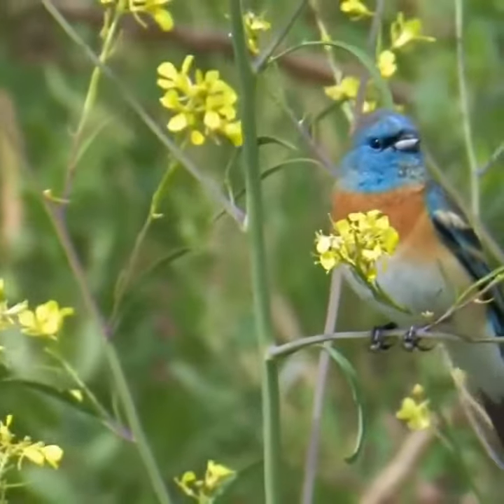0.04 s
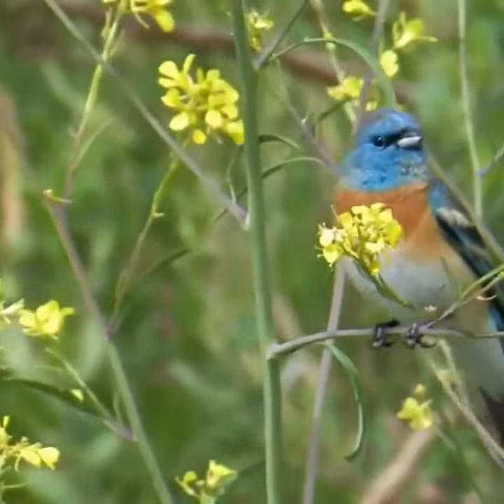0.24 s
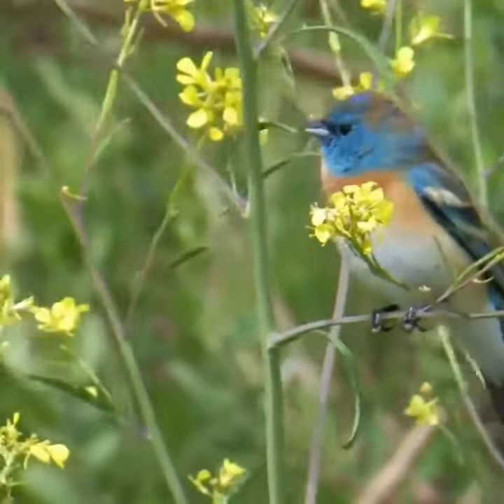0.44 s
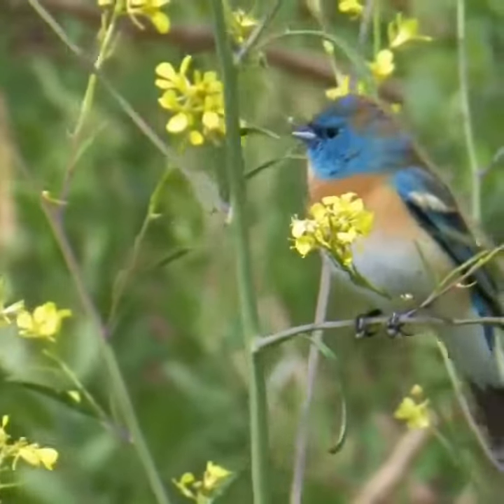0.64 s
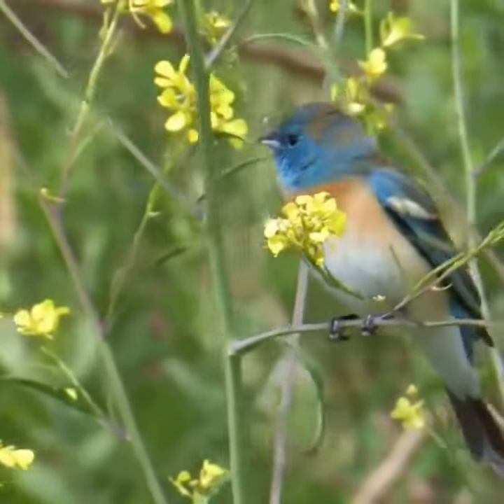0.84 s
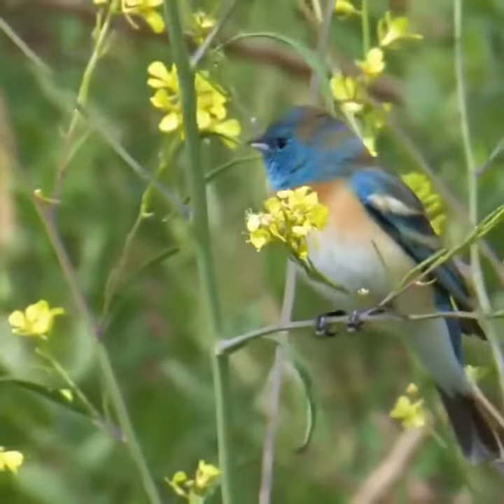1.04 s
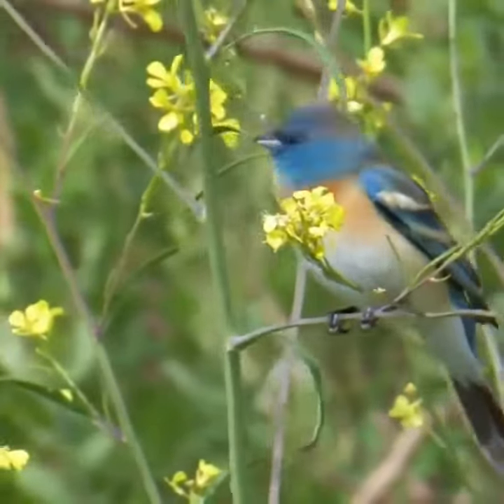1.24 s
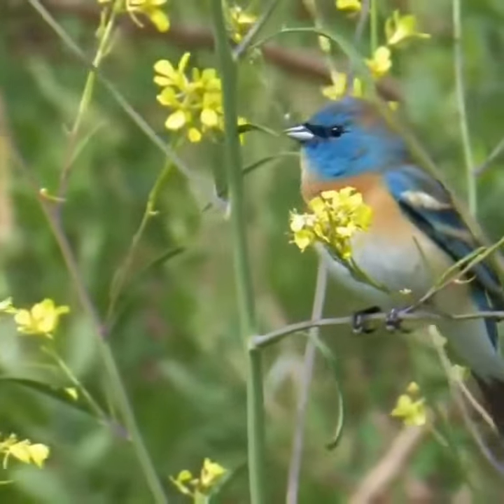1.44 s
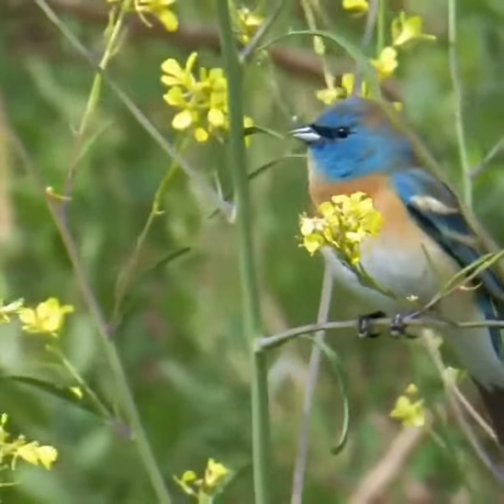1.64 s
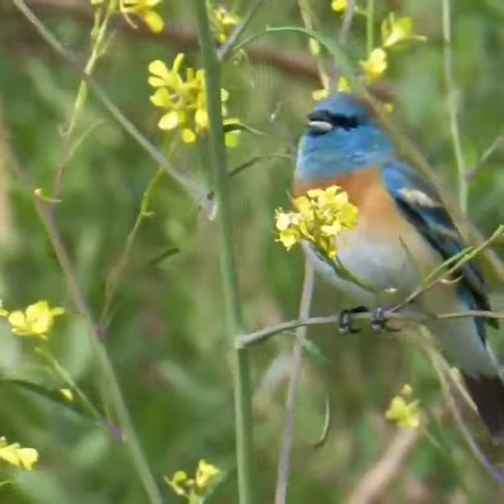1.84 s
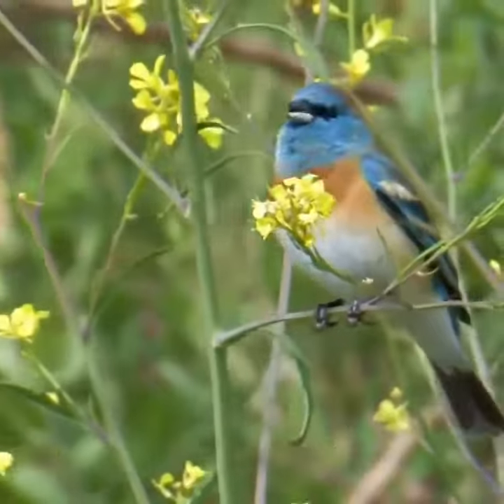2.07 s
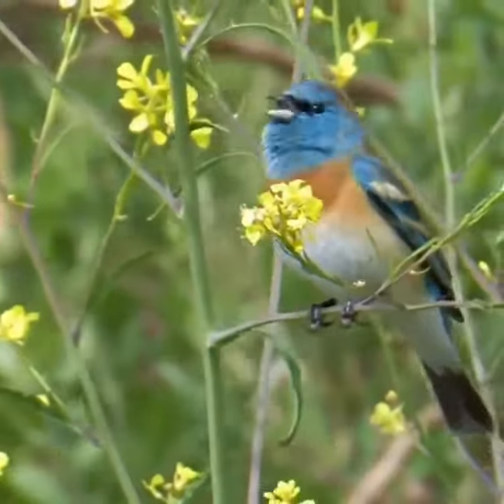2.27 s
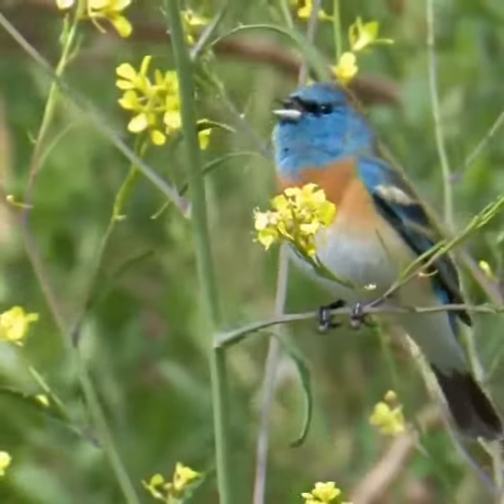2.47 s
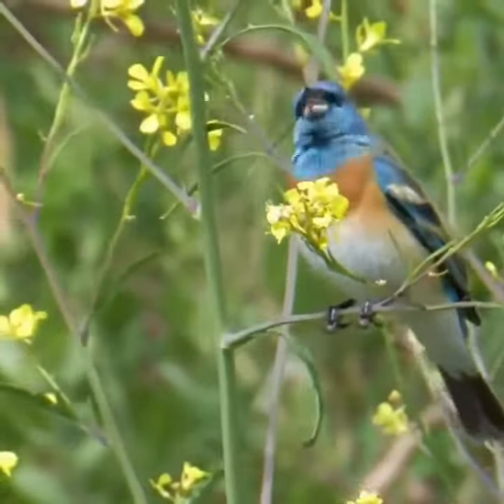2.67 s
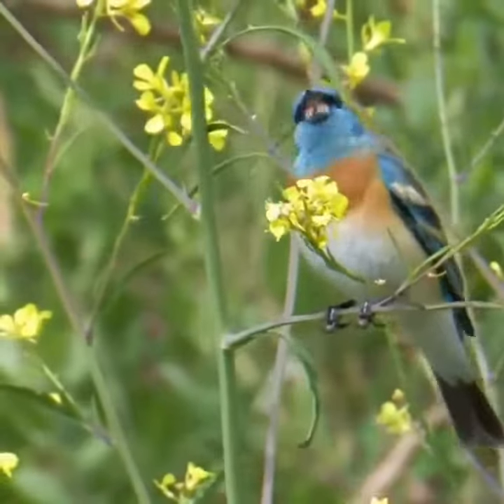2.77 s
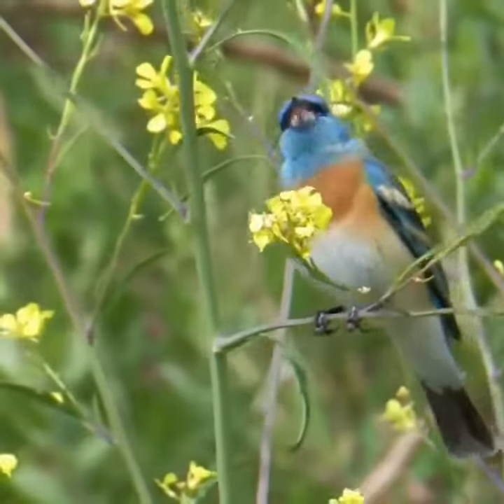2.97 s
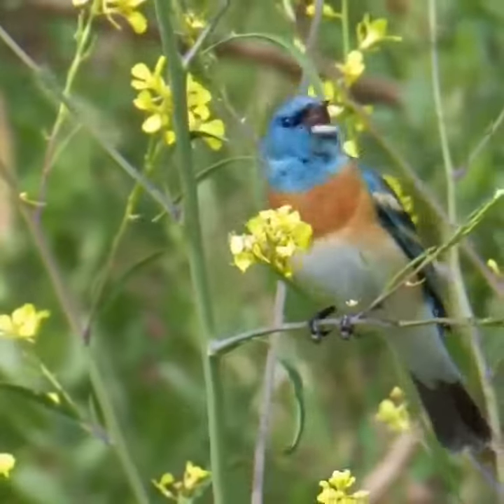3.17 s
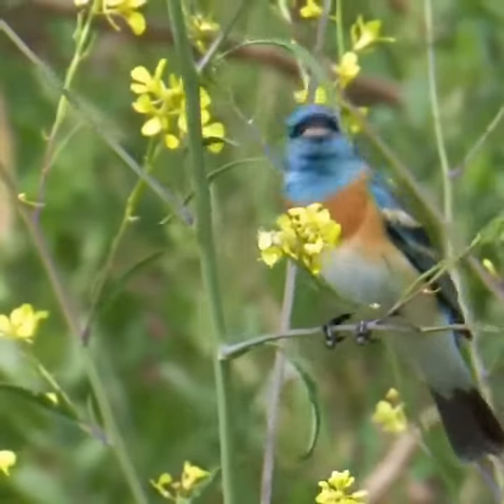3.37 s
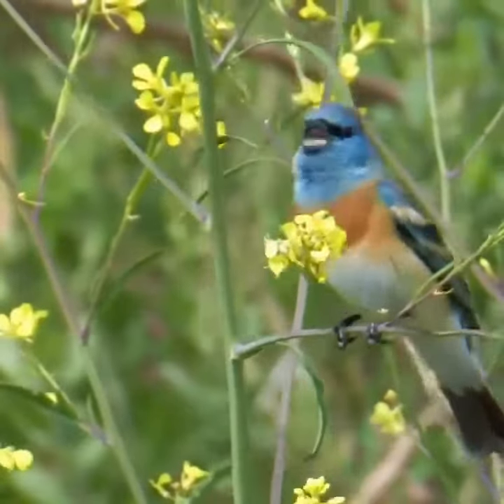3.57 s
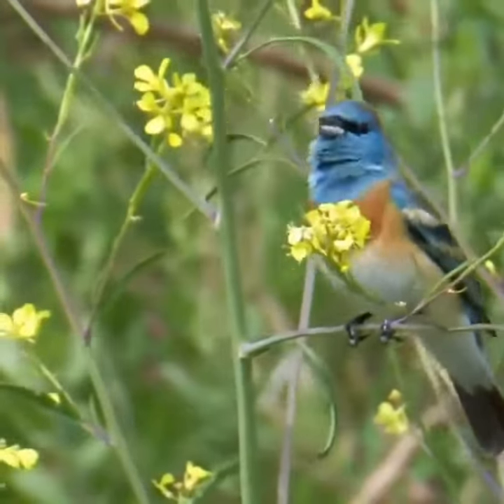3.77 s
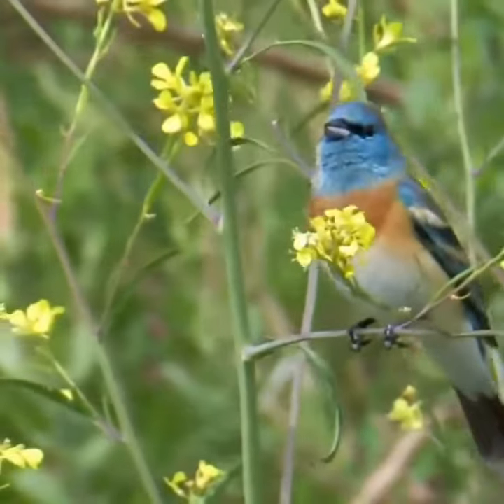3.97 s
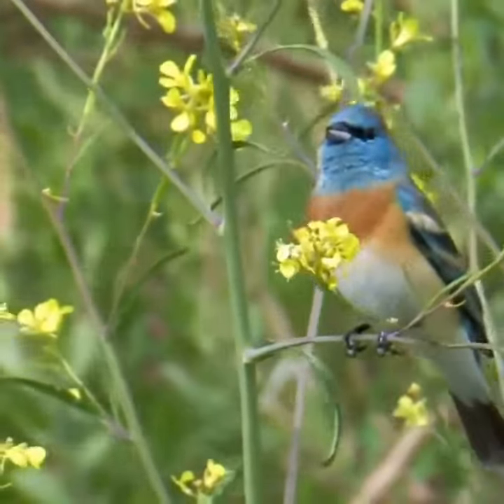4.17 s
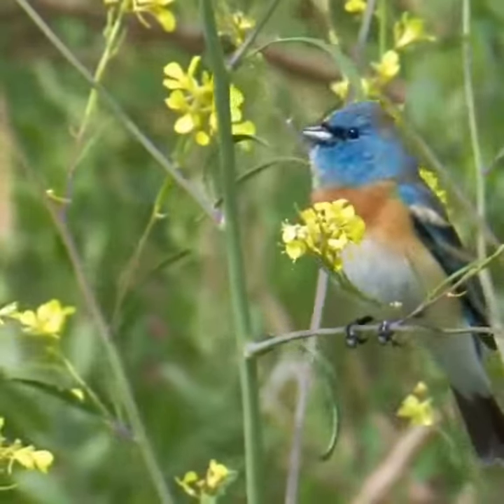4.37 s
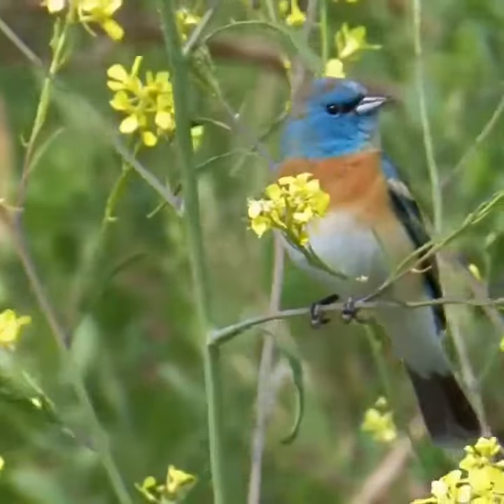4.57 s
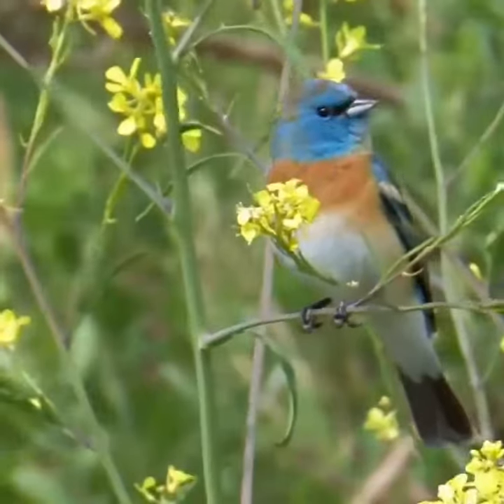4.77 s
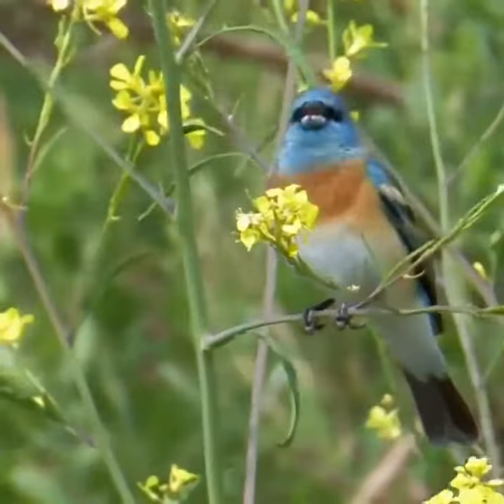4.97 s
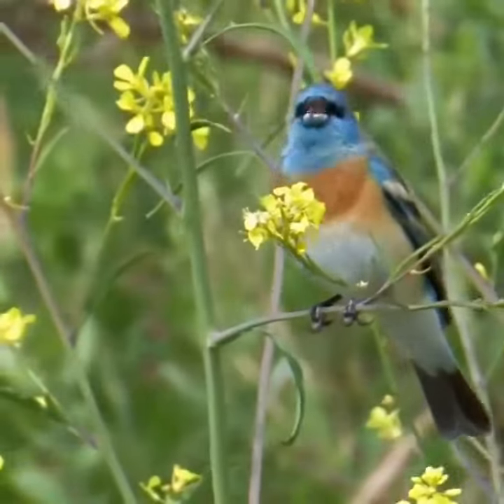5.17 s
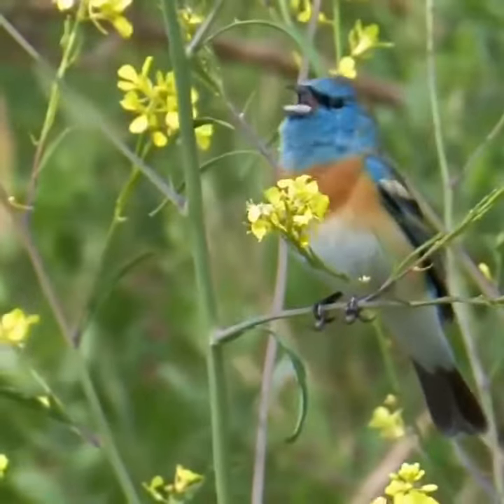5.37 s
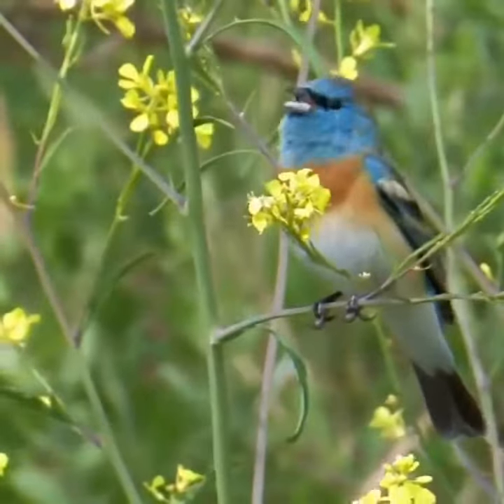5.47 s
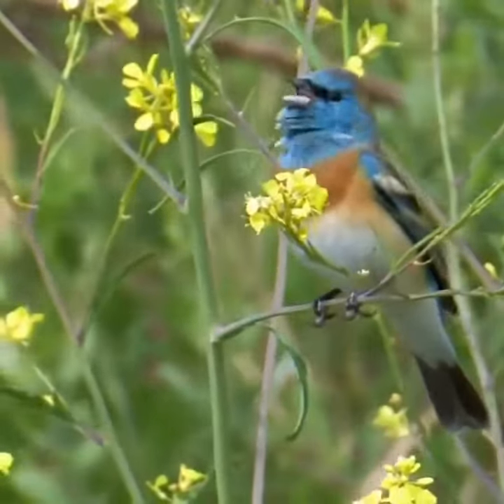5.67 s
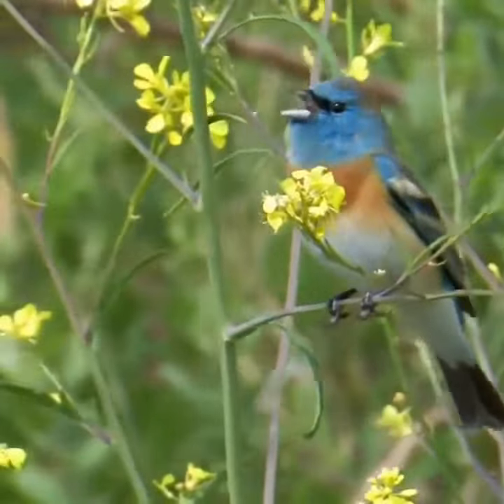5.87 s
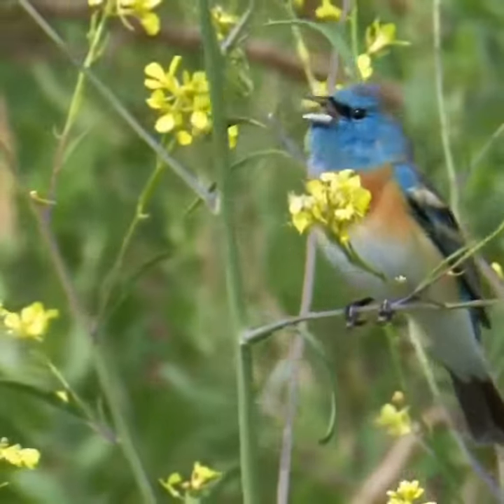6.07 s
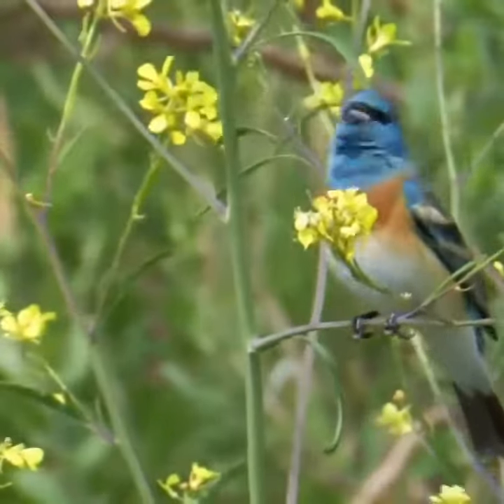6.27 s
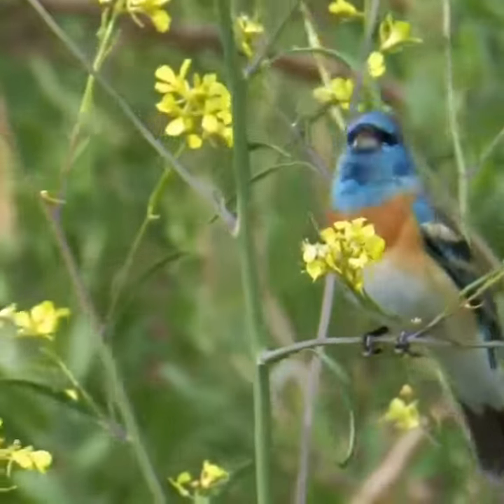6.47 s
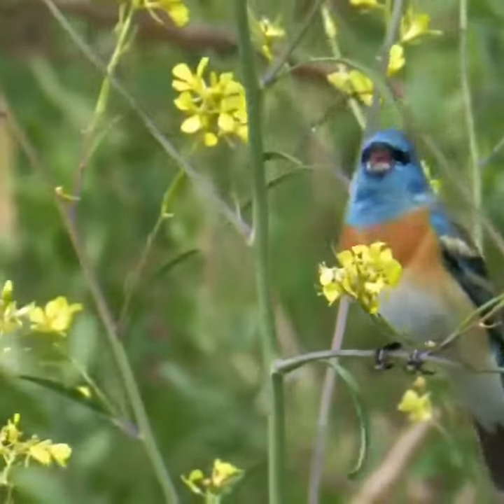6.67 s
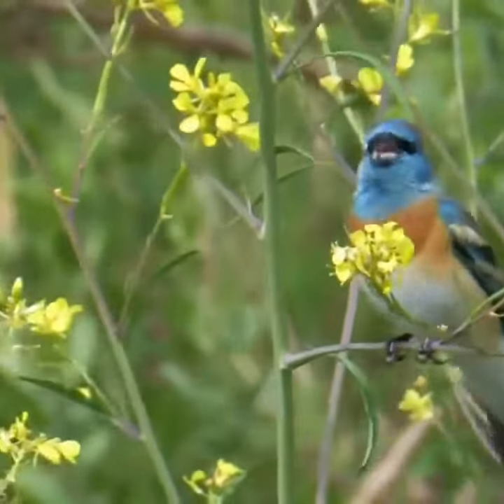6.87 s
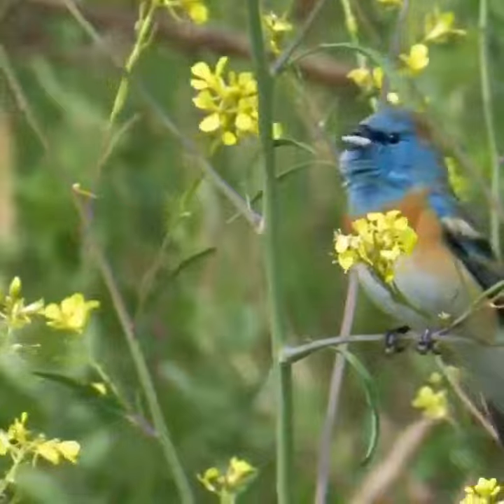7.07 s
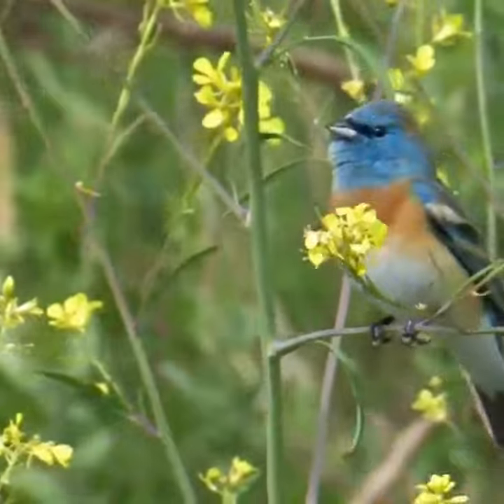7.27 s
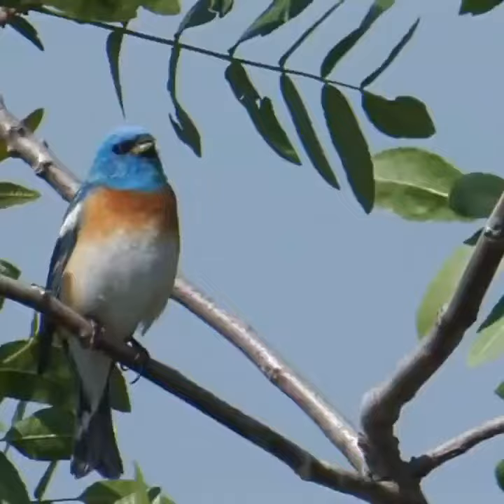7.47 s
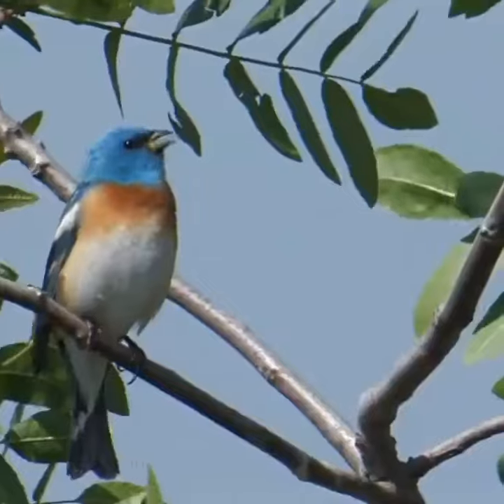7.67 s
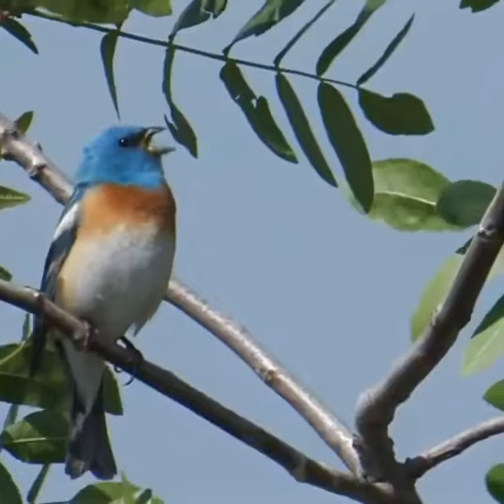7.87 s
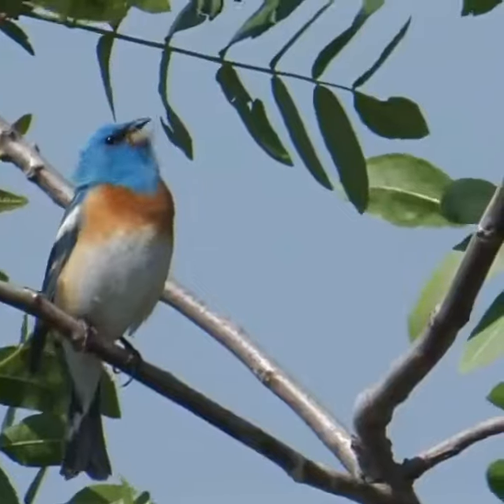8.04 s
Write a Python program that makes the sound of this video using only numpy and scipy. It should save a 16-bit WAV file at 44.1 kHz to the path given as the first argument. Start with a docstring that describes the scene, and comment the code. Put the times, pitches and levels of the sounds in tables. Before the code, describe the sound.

A small songbird close by sings two bright phrases of buzzy notes and fast high sweeps, over outdoor hush, wind rumble and faint distant birds.

```python
"""Hoarse calls and whistles of far songbirds open the scene, over an outdoor hush and gusts on the microphone.
A near bunting then sings two phrases of swept tones: three buzzy notes, a long slur, three V notes, paired sweeps.
A quail crows far off in harmonics; small snaps and a rustle are shaped noise.
The level drops briefly three times; after the last, a second bunting starts up in a quieter place."""
import sys
import numpy as np
from scipy import signal
from scipy.fft import rfft, irfft
from scipy.io import wavfile
from scipy.ndimage import uniform_filter1d

SR = 44100
rng = np.random.default_rng(int(sys.argv[2]) if len(sys.argv) > 2 else 0)


def master_out(mix):
    """Clip the mix to full scale and print it as 16-bit PCM to the path in sys.argv[1]."""
    frames = np.transpose(np.atleast_2d(mix))
    ceiling = np.clip(frames, -1, 1)
    pcm = np.round(ceiling * 32767).astype(np.int16)
    wavfile.write(sys.argv[1], SR, pcm)


N = 371322
TIME = np.arange(N) / SR

# Syllable contours, before the length, pitch and level factors: time_s, pitch_hz, level_db
WHISTLE_SHAPE = [(0.0, 5200, -23.5), (0.017, 5610, -18), (0.0325, 5880, -4.5), (0.0445, 6263, -1.9),
                 (0.065, 6450.0, 0.9), (0.074, 6597, -2), (0.082, 6050, -12)]
SLUR_SHAPE = [(0.0, 2860, -29.5), (0.0215, 2808, -19.5), (0.05, 2926, -16), (0.0875, 3425, -10),
              (0.134, 3860, -2), (0.167, 4200.0, -6.5), (0.1875, 4650.0, -1), (0.211, 5040, -3.9),
              (0.2225, 5000, -28)]
VEE_SHAPE = [(-.004, 7900, -30), (0.006, 6930, -3), (0.016, 5750, 0), (0.023, 4600, -4.5),
             (0.03, 3300, -22), (0.034, 4950, -.5), (0.04, 6200, 2), (0.053, 6680, -3.5),
             (0.061, 6750, -18)]
FLICK_SHAPE = [(0, 2753, -14.5), (.02, 2105, -33), (.032, 2356, -30), (.039, 2906, -11.5),
               (.05, 3500, -2.5), (.0635, 3825, -0.5), (.072, 3740, -34)]  # sinks on from the last fall, then turns up
# When each contour is sung: start_s, length_factor, pitch_factor, level_db
WHISTLE_TIMES = [(2.495, .95, .955, -24), (2.7367, 1.0, .997, -17), (2.9486, 1.03, .99, -12),
                 (5.587, .9, .96, -20.5), (5.827, 1.0, .995, -10.5), (6.0317, 1.0, 1.01, -12.5)]
SLUR_TIMES = [(3.1126, 0.99, 1.0, -8.5), (6.1869, 1.0, 0.99, -8.5)]
VEE_TIMES = [(3.3903, 0.93, 1.044, -9.5), (3.4865, 0.95, 1.034, -8.5), (3.5758, 0.95, 0.99, -9),
             (6.4664, 0.99, 1.046, -12.5), (6.5574, 0.97, 1.003, -10.5), (6.652, 0.93, 1, -10)]
FLICK_TIMES = [(4.346, 1.01, 1, -14), (7.6708, 0.976, 1, -20)]
# Near reflections that reach the microphone: delay_s, gain_left, gain_right
NEAR_REFLECTIONS = [(0.000593, 0.0012, 0.16), (0.000971, -0.028, -0.04), (0.001544, 0.57, 0.52),
                    (0.001819, 0.11, 0.17), (0.002168, 0.22, -0.051), (0.002518, -0.14, -0.14),
                    (0.00312, -0.03, -0.18), (0.003775, 0.0, 0.18)]
# Spectrum of a faint low hiss under the loud notes: frequency_hz, level_db (per Hz)
UNDER_HISS_SPECTRUM = [(120, -25), (300, -3), (1100, 0), (1800, -5), (3000, -20)]


def bunting(hiss_db=-41):
    """Comb filtering: close reflections make each sweep of the near song swell and dip as its pitch moves."""
    song = buzzes() + sing(WHISTLE_SHAPE, WHISTLE_TIMES) + sing(SLUR_SHAPE, SLUR_TIMES)
    song = song + sing(VEE_SHAPE, VEE_TIMES) + sweeps() + sing(FLICK_SHAPE, FLICK_TIMES)
    hz = np.fft.rfftfreq(N, 1 / SR)
    paths = np.ones((2, len(hz)), complex)  # the direct sound
    for delay, left, right in NEAR_REFLECTIONS:
        paths += np.array([[left], [right]]) * np.exp(-2j * np.pi * hz * delay)
    heard = irfft(rfft(song) * paths, N)
    loudness = uniform_filter1d(abs(song), size=400)
    hiss = amp(hiss_db) * loudness * noise(UNDER_HISS_SPECTRUM, AIR_LIKENESS)
    scattered = field(heard, wet_db=-26, t60=0.74, early_db=-13.5, early_t60=0.08)
    return scattered * amp([[.4], [-.4]]) + hiss


# One quick downstroke, at full effort and sung softly (lingering at the top): time_s, pitch_hz, level_db
FULL_STROKE = [(0.0, 5480, -9), (0.003, 5106, -1.5), (0.008, 4666, -1.5), (0.012, 3950.0, 1),
               (0.018, 3330, -21.5)]
SOFT_STROKE = [(0, 4950, -8), (.003, 5120, -0.5), (.009, 4880, 1), (.014, 4350, -4), (.018, 3600, -8)]
# Buzzes of five strokes: start_s, stroke_period_s, pitch_factor, level_db
BUZZ_TIMES = [(2.4092, .0153, 1.01, -33), (2.6503, .0153, .945, -22.5), (2.864, .0145, .965, -16),
              (5.4992, .015, 1.01, -27), (5.7405, .015, .95, -19.5), (5.957, .0148, .98, -14.3)]
# Away from a crest (in strokes, counted from 0) the strokes are softer and shorter
CREST_STROKE, EDGE_DB, EDGE_SHORTER, STROKE_STRETCH = 2.7, -8, .18, 1.1
# Pitch rises with the square of the distance from the lowest stroke
LOWEST_STROKE, EDGE_HIGHER = 1.7, .009


def buzzes(count=5, soft_db=-30, loud_db=-18, last_effort=.55, uneven_db=.8, uneven_pitch=.01):
    """Pulse train: even strokes under one swell; effort straightens and deepens them, and the last one relaxes."""
    out = np.zeros(N)
    for s, period, pitch, top_db in BUZZ_TIMES:
        for k, (louder, higher) in enumerate(rng.standard_normal((count, 2))):
            edge = (k / CREST_STROKE - 1) ** 2
            effort = np.interp(top_db, [soft_db, loud_db], [0, 1])
            if k == count - 1:
                effort *= last_effort
            shape = effort * np.array(FULL_STROKE) + (1 - effort) * np.array(SOFT_STROKE)
            bend = 1 + EDGE_HIGHER * (k - LOWEST_STROKE) ** 2 + uneven_pitch * higher
            length = STROKE_STRETCH - EDGE_SHORTER * edge
            stroke = syllable(shape, length, pitch * bend, jitter=.005, fade=.0016)
            add(out, s + k * period, amp(top_db + EDGE_DB * edge + uneven_db * louder) * stroke)
    return out


# Hook and fall contours, before their factors: time_s, pitch_hz, level_db
HOOK_SHAPE = [(0.0, 2817, -28), (0.0055, 3614, -16), (0.013, 4160, -6.5), (0.0265, 4363, -7.5),
              (0.042, 4577, -4.5), (0.055, 5022, 2.5), (0.06, 6300.0, -7.5), (0.064, 4300.0, -3.5),
              (0.07, 2875, -14.5)]
FALL_SHAPE = [(0, 7640, -23), (.0095, 7220, -11.5), (.023, 6314, -1), (.031, 5213, 3), (.0415, 4480, -2.5),
              (.06, 3803, 0.5), (.08, 3220, -8), (.09, 2924, -18), (.098, 2730, -37)]
# Pairs of sweeps: start_s, hook_pitch_factor, wait_until_fall_s, fall_length_factor, hook_level_db
SWEEP_PAIRS = [(3.6865, .97, .0846, .9, -6.5), (3.9226, 1.003, .0884, .97, -7.3),
               (4.1678, 1.018, .0888, .96, -7.5), (6.7685, .96, .0898, .93, -7.5),
               (7.0058, .99, .0868, .94, -8), (7.2414, 1.013, .0886, .98, -7.5),
               (7.4984, 1.0, .0875, .96, -9.3)]
HOOK_LENGTH, FALL_PITCH, FALL_DB = .99, 1.004, -2.8  # factors, and dB from hook to fall


def sweeps(chirp_db=-15):
    """Two-voice source: a hook, then a long fall; the other side of the syrinx chirps as each hook starts."""
    hooks = sing(HOOK_SHAPE, [(s, HOOK_LENGTH, pitch, db) for s, pitch, _, _, db in SWEEP_PAIRS])
    fall_times = [(s + wait, length, FALL_PITCH, db + FALL_DB) for s, _, wait, length, db in SWEEP_PAIRS]
    falls = sing(FALL_SHAPE, fall_times)
    chirps = whistles([(s + .0015, .012, 3900, 4900, 5640, db + chirp_db) for s, _, _, _, db in SWEEP_PAIRS])
    return hooks + falls + chirps


def sing(shape, rows):
    """Superposition: repeats one syllable at each row's time, length, pitch and level."""
    out = np.zeros(N)
    for s, length, pitch, db in rows:
        add(out, s + shape[0][0] * length, amp(db) * syllable(shape, length, pitch))
    return out


def syllable(shape, length, pitch, jitter=0.003, second_db=-38, second_corner_hz=3300, wide_noise_db=-41, fade=0.0039,
             under_ratio=.405, under_db=-38, mixed_db=-2):
    """Frequency modulation: the syrinx sweeps a near-pure tone; low notes show an octave, high ones an undertone."""
    s, hz, db = np.transpose(shape)
    u = np.arange(s[0], s[-1], 1 / (SR * length))  # contour time, stretched by length when played
    hz = pitch * np.interp(u, s, hz) * (1 + jitter * drift(len(u), 900))
    phase = 2 * np.pi * np.cumsum(hz) / SR
    octave_gain = .1 + 4 / (1 + (hz / second_corner_hz) ** 10)
    octave = amp(second_db) * octave_gain * np.sin(2 * phase)
    third = amp(-43) * (hz < SR / 6) * np.sin(3 * phase)
    mixed = np.sin((2 - under_ratio) * phase) + np.sin(2 * phase)  # the two tones mix into faint overtones
    under_gain = amp(under_db) * np.interp(hz, [5500, 6400], [0, 1])
    under = under_gain * (np.sin(under_ratio * phase) + amp(mixed_db) * mixed)
    wide_noise = amp(wide_noise_db) * rng.standard_normal(len(u))
    tone = np.sin(phase) + octave + third + under + wide_noise
    return amp(np.interp(u, s, db)) * tone * signal.windows.tukey(len(u), 2 * fade / s[-1])


# The second bunting's contours, before their factors: time_s, pitch_hz, level_db
SLIDE_SHAPE = [(0, 5950, -12), (.014, 5830, 0), (.036, 5400, 0), (.046, 4600, -4), (.058, 3250, -11)]
LIFT_SHAPE = [(0, 6650, -20), (.01, 6300, -12), (.026, 6830, 0), (.04, 7180, 1), (.047, 7100, -12)]
# Sung softly, then again louder: start_s, length_factor, pitch_factor, level_db
SLIDE_TIMES = [(8.1, 1, .98, -56), (8.285, 1, 1, -37.5)]
LIFT_TIMES = [(8.174, .7, .975, -43), (8.355, 1, 1, -22)]


def second_bunting(s=8.011, period=.0117, buzz_db=-48, count=4):
    """Reverberant source: from a tree, a tiny buzz, then a slide and a lift, twice, with strong scatter."""
    buzz = whistles([(s + k * period, .0097, 5550, 5250, 4880, buzz_db) for k in range(count)])
    song = buzz + sing(SLIDE_SHAPE, SLIDE_TIMES) + sing(LIFT_SHAPE, LIFT_TIMES)
    return field(song, wet_db=-9, t60=0.58, early_db=-8.5, early_t60=0.064)


# The quail's arched calls: start_s, length_s, end_pitch_hz, top_pitch_hz, left_lag_s, level_db
QUAIL_CALLS = [(3.616, .3, 768, 1091, .00009, -40.5), (5.866, .28, 745, 993, .00013, -42),
               (7.869, .14, 670, 1018, .00009, -44.5)]


def quail(first_db=-13, third_db=-22):
    """Harmonic series with interaural delay: an arched crow from the right, strongest in its second harmonic."""
    out = np.zeros((2, N))
    for s, length, end_hz, top_hz, lag, db in QUAIL_CALLS:
        phase, envelope = arc(length, end_hz, top_hz, end_hz, jitter=.002)
        harmonics = amp(first_db) * np.sin(phase) + np.sin(2 * phase) + amp(third_db) * np.sin(3 * phase)
        call = amp(db) * envelope ** 0.65 * harmonics
        add(out[0], s + lag, call)
        add(out[1], s, call)
    return field(out, wet_db=-10, t60=1.0, early_db=-12.5, early_t60=.1)


# Bent whistles of far songbirds, clear and hoarse; the last clear row is a short fall sung by the second
# bunting: start_s, length_s, start_hz, middle_hz, end_hz, level_db
CLEAR_CALLS = [(.29, .038, 5800, 5260, 4950, -48.5), (.36, .18, 2000, 2250, 1970, -55),
               (1.12, .1, 2900, 2850, 2600, -57), (1.458, .023, 5050, 5100, 5100, -44),
               (1.505, .029, 4900, 4650, 4400, -52), (1.55, .07, 2250, 2440, 1900, -48),
               (1.56, .042, 4400, 3970, 3870, -51), (1.665, .084, 3700, 3100, 2700, -46),
               (2.07, .16, 3000, 2464, 3280, -53.5), (2.21, .073, 3200, 3560, 2940, -49),
               (2.34, .094, 3550, 3270, 2940, -45.5), (2.555, .03, 5400, 5050, 4800, -40),
               (2.99, .11, 2200, 2690, 2490, -49.5), (3.09, .054, 2500, 2240, 2300, -44.5),
               (4.42, .06, 2200, 2090, 1850, -54.5), (4.505, .072, 2400, 2454, 2887, -46.5),
               (4.845, .035, 3900, 3590, 3580, -48.5), (8.206, .044, 4060, 3420, 3300, -55)]
DRAWN_OUT_CALLS = [(.1, 0.31, 2740, 2463, 2530, -53.5), (.18, 0.49, 2655, 2770, 2830, -57),
                   (.33, 0.61, 3470, 4050, 4350, -54.5), (.45, .42, 3200, 3610, 3950, -56),
                   (.55, 0.29, 4100, 4450, 4580, -56), (.6, 0.24, 2550, 2930, 3430, -52),
                   (.7, 0.15, 2610, 2810, 2850, -57), (2.02, 0.29, 4240, 3790, 3530, -63),
                   (2.42, 0.19, 2520, 2670, 2610, -53.5)]


def far_birds(trill_pan_db=-1.5):
    """Diffuse propagation: whistles, hoarse calls, and off to the right a buzz and trill, blurred by distance."""
    trill = (far_buzz() + far_trill()) * amp([[trill_pan_db], [-trill_pan_db]])
    calls = whistles(CLEAR_CALLS) + whistles(DRAWN_OUT_CALLS, jitter=.026) + chatter() + trill
    return field(calls, wet_db=-19, t60=.6, early_db=-6, early_t60=.08)


def far_buzz(s=4.585, length=0.053, centre_hz=3950, flutter_hz=190, swing_hz=250, db=-30):
    """Frequency modulation: a tone with fast vibrato opens the far trill."""
    out = np.zeros(N)
    phase, envelope = arc(length, centre_hz, centre_hz, centre_hz)
    flutter_time = np.cumsum(1 + .12 * drift(len(phase), 200)) / SR
    flutter = swing_hz / flutter_hz * np.sin(2 * np.pi * flutter_hz * flutter_time)
    add(out, s, amp(db) * envelope * np.sin(phase + flutter))
    return out


# Runs of four upstrokes that fade: start_s, stroke_period_s, first_level_db
TRILL_RUNS = [(4.655, .058, -42.5), (4.959, .055, -51.5)]
TRILL_FADE_DB_PER_S = -20


def far_trill(count=4, back_db=-10):
    """Repeated glides: quick upstrokes, each with a weaker way back down."""
    strokes = []
    for s, period, db in TRILL_RUNS:
        for k in range(count):
            strokes.append((s + k * period, db + TRILL_FADE_DB_PER_S * k * period))
    up = whistles([(s, .022, 3200, 4200, 5600, db) for s, db in strokes])
    down = whistles([(s + .022, .022, 5200, 4200, 3600, db + back_db) for s, db in strokes])
    return up + down


def chatter(count=14, until_s=7.8, low_hz=2300, high_hz=4600, length=.07, sag=.09, db=-59.5):
    """Random point process: the faintest birds are short sinking whistles at random times and pitches."""
    rows = []
    for when, high, long, steep in rng.random((count, 4)):
        hz = low_hz * (high_hz / low_hz) ** high ** 2
        start_hz, end_hz = hz * (1 + 2 * sag * steep), hz * (1 - sag * steep)
        rows.append((when * until_s, length * (.5 + long), start_hz, hz, end_hz, db))
    return whistles(rows)


def whistles(rows, jitter=0.0044):
    """Pure tones with pitch jitter: plays a table of bent whistles; more jitter makes them hoarse."""
    out = np.zeros(N)
    for s, length, start_hz, middle_hz, end_hz, db in rows:
        phase, envelope = arc(length, start_hz, middle_hz, end_hz, jitter)
        add(out, s, amp(db) * envelope * np.sin(phase))
    return out


def arc(length, start_hz, middle_hz, end_hz, jitter=.004):
    """Phase integration: phase and soft envelope of a whistle that bends through three pitches."""
    u = np.linspace(0, 1, int(length * SR))
    straight = start_hz + (end_hz - start_hz) * u
    hz = straight + (2 * middle_hz - start_hz - end_hz) * 2 * u * (1 - u)
    phase = 2 * np.pi * np.cumsum(hz * (1 + jitter * drift(len(u), 400))) / SR
    return phase, signal.windows.tukey(len(u), .4)


# Small snaps in the plants: start_s, centre_hz, width_octaves, decay_s, level_db
PLANT_SNAPS = [(.722, 6200, 0.3, 0.004, -35), (2.308, 1400, .85, 0.0057, -33.5),
               (.272, 1550, .25, .005, -45.5)]


def snaps():
    """Impulsive excitation: brief bursts of band noise that rise fast and decay."""
    out, t = np.zeros(N), TIME[:4096]
    hz = np.fft.rfftfreq(len(t), 1 / SR) + 1
    for s, centre_hz, octaves, decay, db in PLANT_SNAPS:
        band = np.exp(-.5 * (np.log2(hz / centre_hz) / octaves) ** 2)
        burst = irfft(rfft(rng.standard_normal(len(t))) * band)
        add(out, s, amp(db) * unit(burst) * np.exp(1 - t / decay) * t / decay / 2)
    return out


# Band of the leaves, also that of the far chorus in air(): frequency_hz, level_db (per Hz)
CHORUS_SPECTRUM = [(1500, -42.5), (2200, -9), (2800, -3), (3500, -3.5), (4300, -9.5), (5200, -13),
                   (7000, -37)]


def rustle(s=1.27, width=0.085, db=-50.5, grain_db=2.0, pan_db=4):
    """Amplitude-modulated noise: leaves stir briefly on the left."""
    swell = np.exp(-.5 * ((TIME - s) / width) ** 2)
    grain = amp(db + grain_db * drift(N, 160))
    return grain * swell * noise(CHORUS_SPECTRUM, AIR_LIKENESS) * amp([[pan_db], [-pan_db]])


# Gusts on the microphone, before the common offset: peak_s, rise_s, fall_s, level_db
GUST_SWELLS = [(.21, .025, .03, -47), (.52, .08, .06, -45.5), (.71, .08, .09, -41), (1.25, .04, .05, -60),
               (1.65, .05, .03, -58), (2.08, .04, .08, -59), (3.93, .2, .05, -52), (4.13, .03, .14, -48),
               (4.56, .09, .14, -44), (5.07, .06, .08, -56.5), (6.33, .015, .03, -57)]
# Breeze between the gusts, before the common offset: time_s, level_db
BREEZE_LEVEL = [(0, -63.5), (3.3, -63.5), (5.8, -68), (7.6, -62.5), (8.1, -71)]
# Rumble spectrum: frequency_hz, level_db (per Hz)
WIND_SPECTRUM = [(12, -57.5), (20, -25), (72, -1), (102, -1.5), (172, -0.5), (217, -5), (264, -10),
                 (356, -17), (450, -19), (580, -47.5), (990, -120)]


def wind(offset_db=-1.5, lumps_db=1.5, breeze_lumps_db=2.5):
    """Low-frequency turbulence noise: an unsteady breeze, with the power of the gusts added."""
    breeze = amp(np.interp(TIME, *np.transpose(BREEZE_LEVEL)) + breeze_lumps_db * drift(N, 9))
    likeness = [(100, .97), (400, .75)]  # frequency_hz, left-right correlation
    lumps = amp(offset_db + lumps_db * drift(N, 25))
    return np.hypot(breeze, swells(GUST_SWELLS)) * lumps * noise(WIND_SPECTRUM, likeness)


# Outdoor hush: time_s, level_db
HUSH_LEVEL = [(0, -51), (2.2, -50.5), (4, -49), (4.9, -51.5), (6.2, -51.5), (7, -49), (7.92, -51),
              (7.98, -56.5)]
# Spectra of the hush and of a faint low drone: frequency_hz, level_db (per Hz)
HUSH_SPECTRUM = [(59, -35), (100, -13), (134, -22.5), (224, -5), (383, -5.5), (434, -5), (491, -5.5),
                 (713, -5), (1270, -6.5), (2090, -8.5), (2410, -7.5), (4220, -8), (5870, -11.5),
                 (13200, -18.5), (14000, -22)]
DRONE_SPECTRUM = [(140, -42.5), (168, -4), (178, -1.5), (190, -6), (230, -38)]
# Swells of the far chorus: peak_s, rise_s, fall_s, level_db
CHORUS_LEVEL = [(.25, .1, .12, -51.5), (.68, .13, .13, -51), (1.6, .1, .14, -57.5), (2.6, .25, .8, -52.5),
                (4.5, .5, .4, -60), (7.5, .9, .25, -58)]
# Likeness of left and right in the air: frequency_hz, correlation (negative is opposed)
AIR_LIKENESS = [(60, 0.93), (130, 0.5), (290, 0.5), (640, 0.32), (1400, 0.29), (3080, -0.19), (6760, 0.7),
                (14800, 1)]


def air(drone_db=-66, chorus_floor_db=-69):
    """Partly coherent noise: outdoor hush, a far chorus that comes and goes, a faint drone that dies away."""
    hush_gain = amp(np.interp(TIME, *np.transpose(HUSH_LEVEL)) + .5 * drift(N, 12))
    hush = hush_gain * noise(HUSH_SPECTRUM, AIR_LIKENESS)
    chorus_gain = np.hypot(amp(chorus_floor_db), swells(CHORUS_LEVEL)) * amp(2.3 * drift(N, 30))
    chorus = chorus_gain * noise(CHORUS_SPECTRUM, AIR_LIKENESS)
    drone_fade_db = np.interp(TIME, [1.8, 2.1, 5.2, 5.6, 8], [-5, -0.5, -0.5, -7.5, -14.5])
    drone = amp(drone_db + drone_fade_db) * noise(DRONE_SPECTRUM, AIR_LIKENESS)
    return hush + chorus + drone


def swells(rows):
    """Power addition: gain of overlapping bell-shaped swells, each with its own rise and fall."""
    power = np.zeros(N)
    for s, rise, fall, db in rows:
        width = np.where(TIME < s, rise, fall)
        power += amp(db) ** 2 * np.exp(-((TIME - s) / width) ** 2)
    return np.sqrt(power)


def noise(spectrum, likeness):
    """Spectral shaping: stereo noise of rms 1 with a given spectrum and left-right correlation."""
    hz = np.fft.rfftfreq(N, 1 / SR)
    a, b = rfft(rng.standard_normal((2, N)))
    same = np.clip(read(likeness, hz), -1, 1)
    pair = np.array([a, same * a + np.sqrt(1 - same ** 2) * b])
    return unit(irfft(pair * amp(read(spectrum, hz)), N))


def field(x, wet_db, t60, early_db, early_t60):
    """Scattering: a quick cloud from the stalks nearby, then a faint tail from the field (t60 in s)."""
    t = np.arange(SR) / SR
    near, far = rng.standard_normal((2, 2, SR)) * (1 - np.exp(-t / 0.0037))
    near = near * amp(-60 * t / early_t60)
    far = far * amp(-60 * t / t60)
    tail = (amp(early_db) * unit(near) + amp(wet_db) * unit(far)) / np.sqrt(SR)
    shared_tail = tail + .35 * tail[::-1]  # each side holds some of the other
    return x + signal.fftconvolve(np.atleast_2d(x), shared_tail, axes=1)[:, :N]


def drift(count, rate_hz):
    """Random modulation: straight lines between normally distributed knots."""
    knots = rng.standard_normal(int(count * rate_hz / SR) + 3)
    return np.interp(np.arange(count) * rate_hz / SR, np.arange(len(knots)), knots)


def read(points, hz):
    """Logarithmic frequency scale: interpolates a table of values over frequency."""
    f, value = np.transpose(points)
    return np.interp(np.log(hz + 1), np.log(f + 1), value)


def amp(db):
    """Decibel law: level to amplitude gain."""
    return 10 ** (np.asarray(db) / 20)


def unit(x):
    """Energy normalisation: scales to rms 1."""
    return x / np.sqrt(np.mean(x ** 2) + 1e-20)


def add(mix, s, sound):
    """Linear superposition: mixes a sound in at time s."""
    part = mix[max(round(s * SR), 0):][:len(sound)]
    part += sound[:len(part)]


# Brief drops in level: start_s, end_s, depth_db
LEVEL_DROPS = [(.85, .871, -26), (4.886, 4.916, -50), (7.925, 7.984, -60)]


def scene():
    """Superposition of sources: the meadow until the last drop, then the second bunting."""
    meadow = bunting() + quail() + snaps() + rustle()
    in_meadow = TIME < np.mean(LEVEL_DROPS[-1][:2])
    return meadow * in_meadow + second_bunting() + far_birds() + wind() + air()


EDGE_HZ = 14500  # upper band limit


def record(dry):
    """Gain and low-pass filtering: short fades into and out of each drop, then the band limit."""
    live = np.ones(N)
    for start, end, depth_db in LEVEL_DROPS:
        live[(TIME > start) & (TIME < end)] = amp(depth_db)
    faded = dry * uniform_filter1d(live, size=260)
    low_pass = signal.firwin(255, EDGE_HZ, window=("kaiser", 9), fs=SR)
    return signal.oaconvolve(faded, low_pass[None], "same")


dry = scene()
out = record(dry)
master_out(out)
```